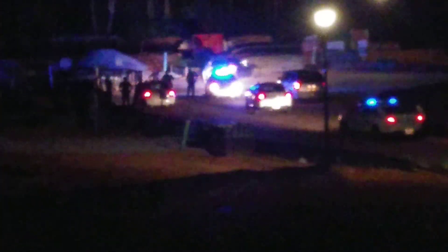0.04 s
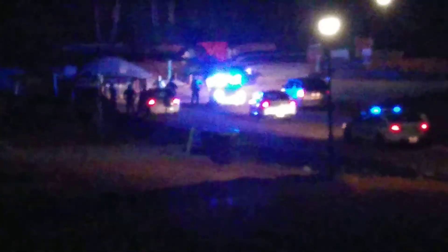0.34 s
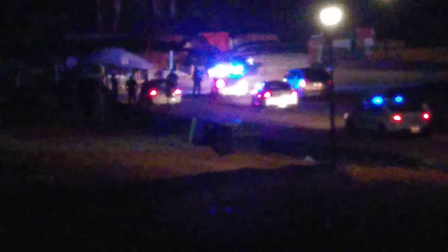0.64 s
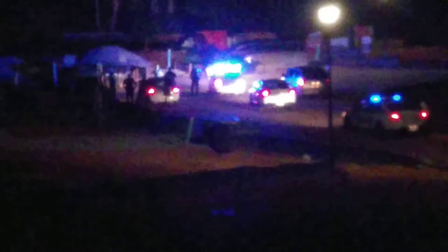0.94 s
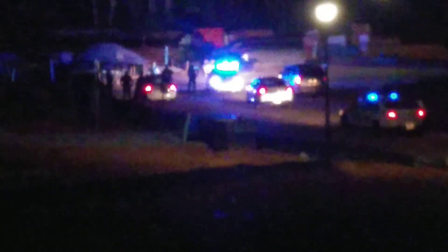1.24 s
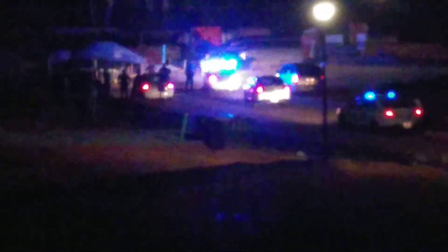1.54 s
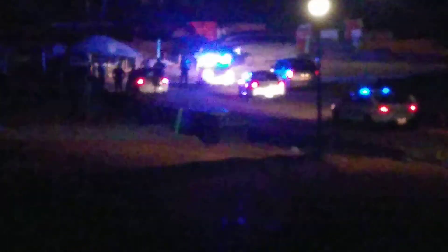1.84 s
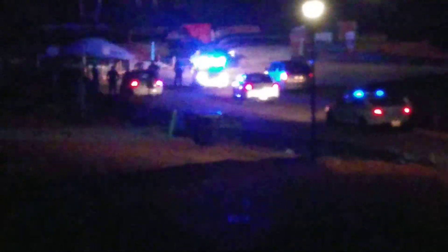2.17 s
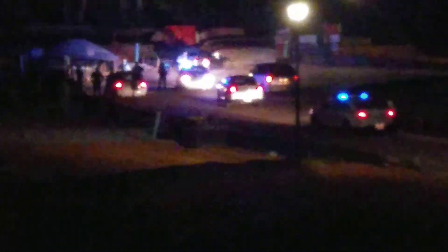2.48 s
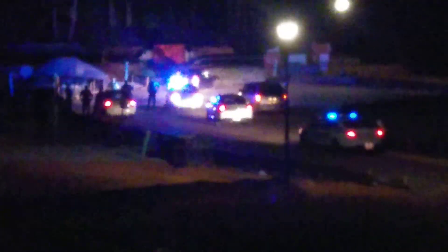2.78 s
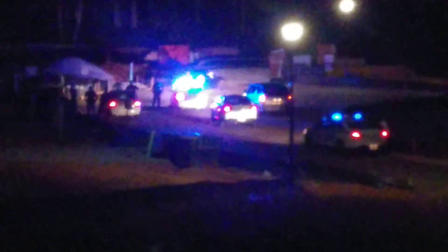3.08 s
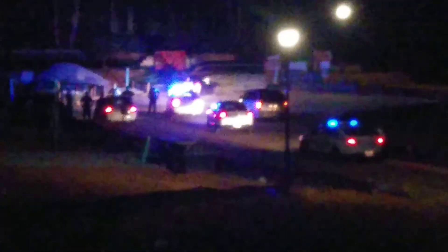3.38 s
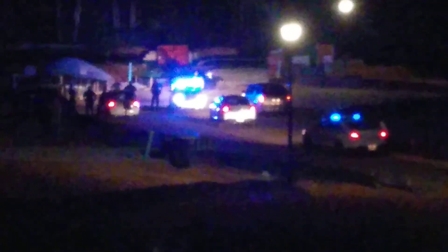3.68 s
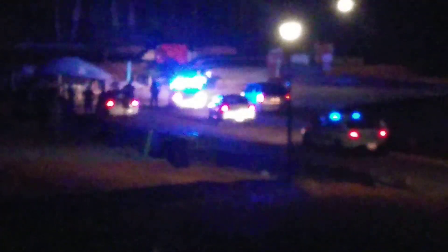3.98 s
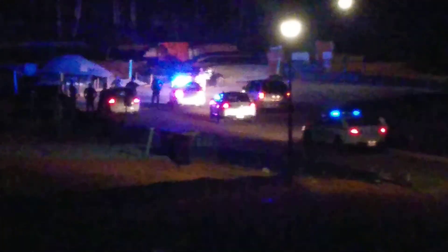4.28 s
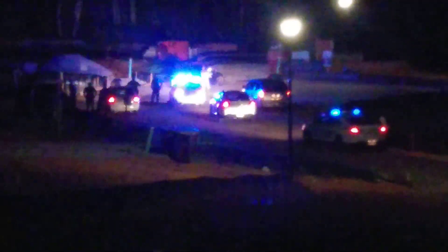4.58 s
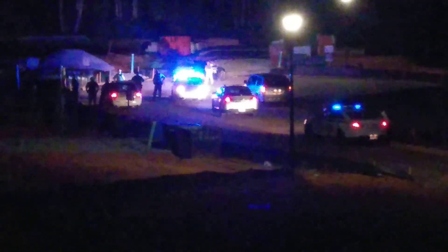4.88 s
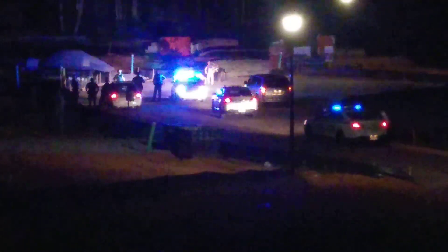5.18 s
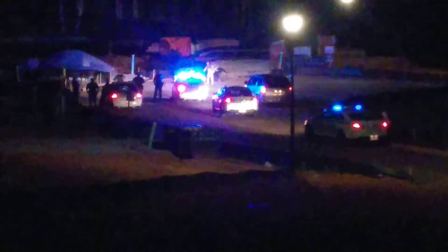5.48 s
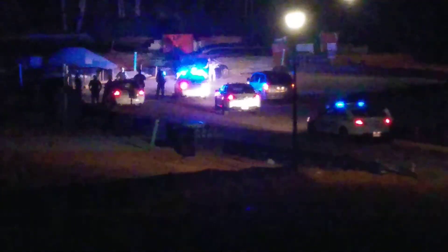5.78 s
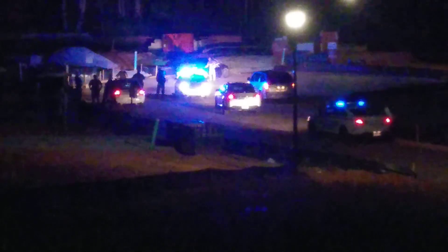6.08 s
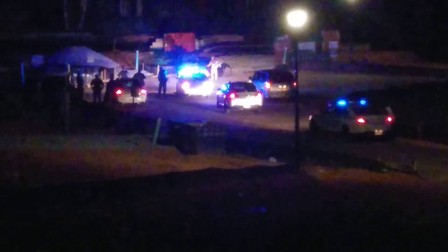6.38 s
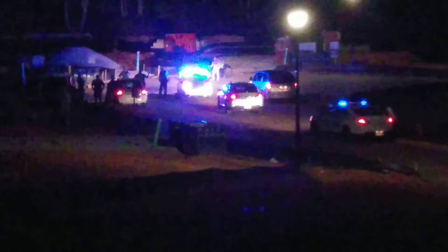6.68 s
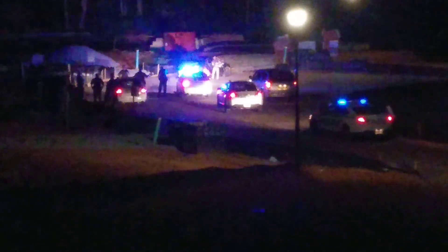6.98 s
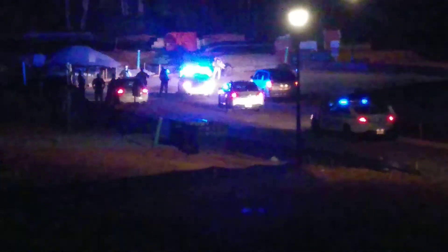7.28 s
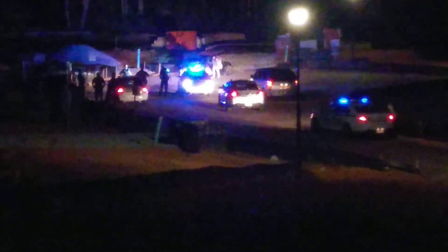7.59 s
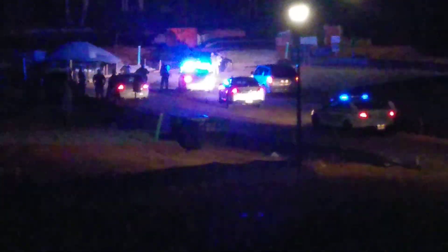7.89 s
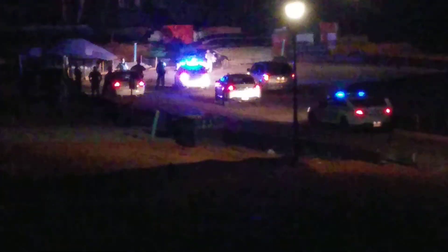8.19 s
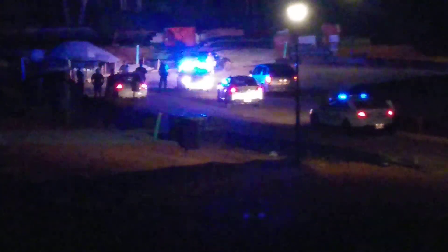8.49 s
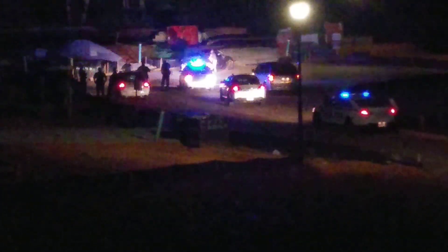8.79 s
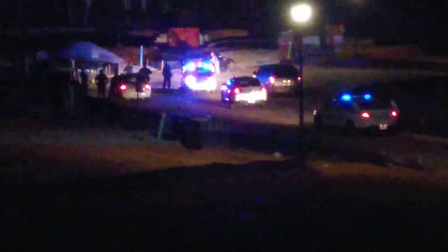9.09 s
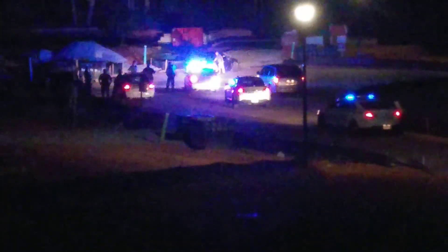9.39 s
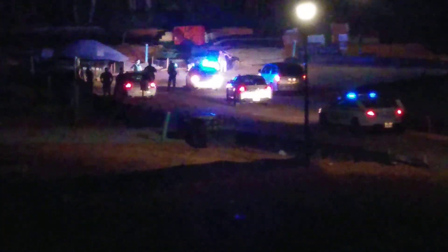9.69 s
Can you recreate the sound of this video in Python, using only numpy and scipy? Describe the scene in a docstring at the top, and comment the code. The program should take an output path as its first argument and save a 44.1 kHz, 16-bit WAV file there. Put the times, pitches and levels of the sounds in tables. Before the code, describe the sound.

Outdoors at night, a nearby cricket keeps up a fast, high-pitched trill, breaking off twice and quickly starting again. Behind it lies the low rumble of distant idling cars; one engine rises early on, then settles and fades as it moves slowly. Faint, short tree frog trills come and go over a soft haze of far insects. The cricket stays in front, with almost no echo.

```python
"""A cricket at night

A cricket trills close by in the grass, stopping twice for a moment. It sings by stridulation: some
fifty times a second a scraper on one wing runs down a file on the other, slowing as it goes, so each
stroke is a falling chirp. Far off, cars idle with a low hum, and one revs briefly and creeps along;
tree frogs trill faintly and distant insects make a soft haze."""
import sys
import numpy as np
from scipy import signal
from scipy.fft import rfft, irfft
from scipy.io import wavfile
from scipy.ndimage import uniform_filter1d

SR = 44100
rng = np.random.default_rng(int(sys.argv[2]) if len(sys.argv) > 2 else 0)


def persist_wave(psi):
    """Save psi, clipped to +-1, as 16-bit WAV."""
    counts = np.round(np.clip(psi, -1, 1) * 32767).astype(np.int16)
    wavfile.write(sys.argv[1], SR, np.atleast_2d(counts).T)


N = 433944

# runs of the trill: start t/s, end t/s, cruising stroke rate/Hz, extra rate while fresh/Hz
TRILL_BOUTS = [(-0.0024, 2.14, 52.9355, -1.538), (2.3921, 7.98, 52.1819, 3.488),
               (8.3645, 11, 52.0978, 4.09)]
# brief lags and spurts: centre t/s, half length/s, change of stroke rate/Hz
PACE_CHANGES = [(1.638, .2636, -1.363), (6.708, .3005, -2.222), (6.904, .13, 1.9), (7.393, .1, -3.203)]
# how hard the cricket sings: t/s, relative level of the tone/dB
SINGING_EFFORT = [(0, -37.5), (.45, -40), (1.5, -35), (2.13, -34.5), (2.5, -38.5), (2.95, -42),
                  (7.05, -40.5), (7.55, -37.5), (7.85, -43.5), (8.36, -42.5), (8.55, -40.5), (9.8, -36.5)]
# held wing positions: from t/s, cancelled f/Hz, depth of cancellation (0-1), lowest f of the sweep/Hz,
# gain of its low end/dB, relative overtone level/dB, relative scratch level/dB
WING_POSTURES = [(0, 4140, .95, 4040, 2, -69, -46), (1.15, 4145, 0.8, 4000, -1.5, -65, -49),
                 (2.6, 4302, 0.78, 3730, 3.5, -64, -52), (7.08, 4000, 0.5, 4060, -2, -63.5, -52),
                 (7.75, 4440, 0.6, 4000, 10, -66.5, -50), (8.17, 4230, 0.54, 3800, 1, -65, -51),
                 (9.3, 4140, .55, 4080, -1.5, -63, -54)]
# modes that ring as the scraper catches the file: f/Hz, level/dB, decay time T60/s
WING_MODES = [(4896, -39.5, 0.015), (5174, -46, 0.018), (5640, -38, 0.0067), (6440, -47, 0.0018)]
# spectrum of the wings' dry scratch: f/Hz, relative level/dB
SCRATCH_SPECTRUM = [(2000, -31), (3600, -19), (4400, 12), (5150, -1.5), (5450, -2.5), (5850, -0.5),
                    (6500, -6.5), (7500, -18.5), (8600, -14), (10000, -42), (12000, -39.5), (15500, -24)]
# friction as the wings part and reopen: t within the stroke/s, half length/s, relative level/dB
SCRATCH_PUFFS = [(0.0126, 0.0012, -1), (0.0181, 0.0016, -1.7)]
# exhaust note of the moving car: t/s, firing f/Hz, relative level/dB
EXHAUST_NOTE = [(.45, 58, -47), (.7, 73, -42), (.95, 90, -42), (1.2, 94, -38.5), (1.6, 77, -40),
                (2.9, 73, -43.5), (4.15, 73, -44), (4.35, 75, -52), (4.6, 76.5, -47), (5.8, 80, -46.5),
                (6.3, 81, -55.5), (7.1, 82, -51.5), (7.4, 82, -55)]
# idling engines and their fans: f/Hz, level/dB, rms waver/Hz
IDLE_TONES = [(58.5, -51.5, 1.69), (107.5, -57, 1.46), (439.5, -67.5, 2.97)]
# spectrum of far engines: f/Hz, relative level/dB
RUMBLE_SPECTRUM = [(20, -35), (35, -18), (47, -6), (60, -1), (85, -3), (125, -6), (150, -8), (190, -10),
                   (245, -12), (275, -10), (370, -20.5), (600, -48.5), (2000, -100)]
# spectrum of far fans and tyres: f/Hz, relative level/dB
ROAR_SPECTRUM = [(200, -13.5), (380, -4), (500, -2), (720, -2), (950, 0.5), (1150, -1), (1380, -1.5),
                 (1780, -3.5), (2050, -8), (2550, -9.5), (2850, -12.5), (3500, -11), (5000, -28),
                 (8000, -73.5)]
# far vehicles swell and sink: loudest t/s, half length/s, centre f/Hz, rise/dB
TRAFFIC_SWELLS = [(0.403, 1.35, 218, 5.5), (.5, 0.26, 50, 5), (1.598, 2.1, 1420, 2.5), (2.1, .3, 50, 9.5),
                  (2.55, .4, 218, 4), (6.05, 0.48, 49.7, 8), (6.553, 0.46, 746, 4), (7.552, 0.43, 1190, 2),
                  (7.6, 1.1, 100, 1), (8.1, .15, 50, 11.5), (9.5, 0.45, 50, 11.5)]
# tree frog trills: start t/s, length/s, f/Hz, level/dB
FROG_CALLS = [(.4, 0.98, 2590, -63), (1.35, .65, 2680, -68), (2.8, 0.42, 2330, -64),
              (3.45, 0.97, 2580, -62.5), (4.9, 0.91, 2590, -64), (5.6, .55, 2337, -62),
              (7.2, 0.91, 2550, -60.5), (8.9, 0.49, 2370, -60), (9.35, 0.553, 2620, -66)]
# spectrum of far insects and air: f/Hz, relative level/dB
HAZE_SPECTRUM = [(1500, -28.5), (3000, -12), (4400, 0.5), (5400, -6.5), (6300, -4.5), (7500, -11),
                 (9200, -16), (11000, -24), (13000, -23.5), (15500, -22.5)]


def cricket(tone_db=9.0, overtone_db=2, weak_start_db=-5, pitch_spread=.002, length_spread=.02):
    """Stridulation: the scraper strikes the file's teeth, and the wings radiate at the tooth rate."""
    t = np.arange(N) / SR
    starts, since_rest, hurry = strokes()
    stroke = np.maximum(np.searchsorted(starts, t) - 1, 0)
    pitch, length, force, ring_phase = rng.standard_normal((len(starts), 4))[stroke].T
    age = np.where(t < starts[0], 1, t - starts[stroke])
    along = age * (1 + length_spread * length)  # each stroke runs on its own time scale
    null_hz, depth, lowest_hz, low_db, over_db, scratch_db = posture(starts)[:, stroke]
    # hurried strokes sound flat; the first after a rest are weak and flatter still
    starting = np.exp(-since_rest / .04) * (hurry > 0)
    level_db = (follow(SINGING_EFFORT, starts)[0] + weak_start_db * starting)[stroke]
    speed = (1 - .0034 * hurry - .014 * starting)[stroke]
    teeth_hz, loudness, friction = stroke_shape(along)
    turns = np.cumsum(teeth_hz * speed * (1 + pitch_spread * pitch)) / SR
    phase = 2 * np.pi * (turns - np.interp(starts, t, turns)[stroke])
    # pressing on to the end of the file brings out the sweep's low end, until the scraper lifts off
    late = np.clip((along - 0.0077) / 0.0052, 0, 1)
    touching = step(teeth_hz - lowest_hz, width=60)
    chirp = touching * loudness * amp(tone_db + level_db + late * low_db) * np.sin(phase)
    tone = wing_interference(chirp, null_hz * speed, depth)
    # overtones follow the loudness by a power law and sound as they cross the upper wing resonances
    bite = amp(over_db + overtone_db) * loudness ** 0.83
    second = amp(6.5) * resonate(bite * np.sin(2 * phase), hz=8985, width_hz=480)
    third = amp(-10) * resonate(bite * np.sin(3 * phase), hz=13690, width_hz=260)
    # the wings ring softly as they open again
    ring = amp(-43) * bump(along, 0.01373, 0.0014) * np.sin(2 * np.pi * 4330 * age + ring_phase)
    scratch = wing_scratch(amp(scratch_db) * friction)
    song = wing_inertia(tone + wing_snap(age) + ring) + second + third + scratch
    return song * amp(0.05 * uniform_filter1d(force, size=64))


def strokes(fresh_s=.723, brake_hz=12.706, brake_s=.1039, jitter_s=0.0002556):
    """Phase is the integral of rate: one stroke starts per cycle, as the pace settles and then brakes."""
    bouts = []
    for start, end, cruise_hz, fresh_hz in TRILL_BOUTS:
        t = np.arange(start, end, 1 / SR)
        hurry = fresh_hz * np.exp((start - t) / fresh_s)
        braking = brake_hz * np.exp((t - end) / brake_s)
        wander = sum(change * bump(t, s, half) for s, half, change in PACE_CHANGES)
        cycles = np.cumsum(cruise_hz + hurry - braking + wander) / SR
        bouts.append([np.interp(np.arange(cycles[-1]), cycles, v) for v in (t, t - start, hurry)])
    starts, since_rest, hurry = np.hstack(bouts)
    return starts + jitter_s * rng.standard_normal(len(starts)), since_rest, np.maximum(hurry, 0)


def posture(t, shift_s=.06):
    """Wing position sets the timbre: each posture is held, then eased into the next."""
    rows = np.array(WING_POSTURES, float)
    shifts = sum((new - old)[1:, None] * step(t - new[0], shift_s) for old, new in zip(rows, rows[1:]))
    return rows[0, 1:, None] + shifts


def stroke_shape(along, base_hz=4616, run_off_s=0.013, attack_s=.0012, fade_db_per_s=1600):
    """Tooth rate is proportional to speed: the scraper leaps on, slows ever more and runs off the file."""
    leap_hz = 1600 * np.exp(-along / 0.00028)
    slowing_hz = 19200 * along + 3100000 * np.minimum(along, run_off_s) ** 2
    on_file = step(run_off_s - along, width=0.00088)
    attack = 1 - np.exp(-(along / attack_s) ** 1.5)
    loudness = attack * amp(6.5 - fade_db_per_s * along) * on_file
    puffs = sum(amp(db) * bump(along, s, half) for s, half, db in SCRATCH_PUFFS)
    friction = amp(-549.5 * along) * on_file + puffs
    return base_hz + leap_hz - slowing_hz, loudness, friction


def wing_interference(tone, null_hz, depth, gap_hz=205):
    """Destructive interference: the two wings cancel each other in two narrow bands."""
    tone = tone - np.clip(depth, 0, 1) * resonate(tone, null_hz, width_hz=110)
    return tone - np.clip(0.94 * depth, 0, 1) * resonate(tone, null_hz - gap_hz, width_hz=70)


def wing_snap(age, rise_s=0.00015):
    """Free vibration: the scraper's first catch excites damped modes of the wing."""
    modes = sum(amp(db - 60 * age / t60) * np.sin(2 * np.pi * hz * age) for hz, db, t60 in WING_MODES)
    return (1 - np.exp(-age / rise_s)) ** 2 * modes


def wing_scratch(pressure):
    """Friction noise, proportional to the pressure, is filtered by the wing's response."""
    response = unit(amp(colour(SCRATCH_SPECTRUM, np.fft.rfftfreq(N, 1 / SR))))
    return irfft(rfft(pressure * rng.standard_normal(N)) * response, N)


def wing_inertia(x, cutoff_hz=7000):
    """Inertia acts as a low-pass: the whole wing cannot start at once, so its note has no sharp click."""
    return signal.sosfilt(signal.butter(6, cutoff_hz, fs=SR, output="sos"), x)


def surroundings(x, echo_s=.0031, echo_db=-23, scatter_db=-22, t60_s=0.099):
    """Reflection and scattering: one near echo, then a short faint tail from grass and bushes."""
    t = np.arange(SR // 4) / SR
    tail = rng.standard_normal(len(t)) * amp(-60 * t / t60_s) * (t > echo_s)
    scatter = signal.fftconvolve(x, tail / np.linalg.norm(tail))[:N]
    echo = np.interp(np.arange(N) - round(echo_s * SR), np.arange(N), x, left=0)
    return x + amp(echo_db) * echo + amp(scatter_db) * scatter


def moving_car(gain_db=1.5, flutter=0.14, rise_s=0.12, fade_s=0.29):
    """Periodic firing gives a harmonic exhaust note that rises with the throttle, settles and fades."""
    t = np.arange(N) / SR
    firing_hz, note_db = follow(EXHAUST_NOTE, t)
    phase = 2 * np.pi * np.cumsum(firing_hz) / SR
    start, end = EXHAUST_NOTE[0][0], EXHAUST_NOTE[-1][0]
    running = np.clip((t - start) / rise_s, 0, 1) * np.clip((end - t) / fade_s, 0, 1)
    note = np.sin(phase) + amp(-22) * np.sin(2 * phase) + amp(-20) * np.sin(3 * phase)
    return amp(gain_db + note_db) * running * unit(note) * (1 + flutter * drift(8.8))


def exhaust_drone(hz=219, width_hz=24, level_db=-55, fade_db_per_s=0.9):
    """Pipe resonance: rough exhaust flow booms as the car pulls away, then slowly recedes."""
    t = np.arange(N) / SR
    pipe = resonate(resonate(rng.standard_normal(N), hz, width_hz), hz, width_hz)
    boom_db = 10.5 * bump(t, centre=0.67, half_width=0.34)
    return amp(level_db - fade_db_per_s * t + boom_db) * unit(pipe)


def idling_cars(unsteady_db=2):
    """Rotating engines and fans hum in tones with slow random frequency and amplitude modulation."""
    hum = np.zeros(N)
    for hz, db, waver_hz in IDLE_TONES:
        gain = amp(db + unsteady_db * drift(3))
        phase = 2 * np.pi * np.cumsum(hz + waver_hz * drift(4.11)) / SR
        hum += gain * unit(np.sin(phase))
    return hum


def traffic(rumble_db=-51, roar_db=-50.0, patchy_db=1, swell_octaves=0.92):
    """Broadband noise of far engines, fans and tyres adds up; each passing vehicle lifts its own band."""
    steady = amp(rumble_db) * noise(RUMBLE_SPECTRUM) + amp(roar_db) * noise(ROAR_SPECTRUM)
    hz, t, spectra = signal.stft(steady, SR, nperseg=2048, noverlap=1536)
    swell_db = sum(db * np.outer(bump(np.log2(hz + 1), np.log2(mid_hz), swell_octaves), bump(t, s, half))
                   for s, half, mid_hz, db in TRAFFIC_SWELLS)
    patches = uniform_filter1d(rng.standard_normal(spectra.shape), size=12, axis=0)
    patches = unit(uniform_filter1d(patches, size=14, axis=1))
    spectra = spectra * amp(swell_db + patchy_db * patches)
    return signal.istft(spectra, SR, nperseg=2048, noverlap=1536)[1][:N]


def tree_frogs(pulses_per_s=44, width_hz=190, blur=3.4):
    """Source and filter: a pulse train drives the vocal sac's resonance, blurred by distance."""
    t, calls = np.arange(N) / SR, np.zeros(N)
    throb = np.maximum(np.sin(2 * np.pi * np.cumsum(pulses_per_s + drift(2.3)) / SR), 0) ** 2
    drive = rng.standard_normal(N) * (throb + blur * throb.mean())
    for start, length, hz, db in FROG_CALLS:
        swell = np.sqrt(abs(np.sin(np.pi * np.clip((t - start) / length, 0, 1))))
        broad = signal.lfilter(*signal.iirpeak(hz, hz / width_hz / 2, SR), drive)
        sac = signal.lfilter(*signal.iirpeak(hz, hz / width_hz, SR), broad)
        calls += amp(db) * swell * unit(sac)
    return calls


def insect_haze(level_db=-61):
    """Incoherent summation: many far insects blur into a soft hiss."""
    return amp(level_db) * noise(HAZE_SPECTRUM)


def resonate(x, hz, width_hz):
    """A damped resonator of gain 1 whose centre frequency may move."""
    carrier = np.exp(2j * np.pi * np.cumsum(hz * np.ones(N)) / SR)
    pole = np.exp(-np.pi * width_hz / SR)
    return 2 * (carrier * signal.lfilter([1 - pole], [1, -pole], x / carrier + 1e-18)).real


def noise(spectrum):
    """Stationary noise of rms 1 with the given spectrum."""
    gain = amp(colour(spectrum, np.fft.rfftfreq(N, 1 / SR)))
    return unit(irfft(rfft(rng.standard_normal(N)) * gain, N))


def drift(bandwidth_hz):
    """A slow random fluctuation of rms 1."""
    hz = np.fft.rfftfreq(N, 1 / SR)
    return unit(irfft(rfft(rng.standard_normal(N)) * np.exp(-(hz / bandwidth_hz) ** 2), N))


def colour(spectrum, hz):
    """Levels in dB, interpolated on a log-frequency axis."""
    f, db = np.transpose(spectrum)
    return np.interp(np.log(hz + 1), np.log(f + 1), db)


def follow(rows, t):
    """A table's columns, interpolated linearly in time."""
    times, *columns = np.transpose(rows)
    return [np.interp(t, times, column) for column in columns]


def bump(x, centre, half_width):
    """A Gaussian bell of height 1."""
    return np.exp(-((x - centre) / half_width) ** 2)


def step(x, width):
    """A soft step from 0 to 1 where x passes zero."""
    return .5 + .5 * np.tanh(x / width)


def amp(db):
    """Amplitude ratio of a level in dB."""
    return 10 ** (np.asarray(db) / 20)


def unit(x):
    """Normalisation to rms 1."""
    return x / np.sqrt(np.mean(x ** 2) + 1e-20)


def scene():
    """Superposition: the near cricket and the far sources add in one channel."""
    near = surroundings(cricket())
    far = tree_frogs() + moving_car() + idling_cars() + exhaust_drone() + traffic() + insect_haze()
    return (near + far)[None]


def record(dry, edge_hz=15800):
    """Band limiting: a linear-phase low-pass removes the highest treble."""
    return signal.oaconvolve(dry, signal.firwin(511, edge_hz, window=("kaiser", 9), fs=SR)[None], "same")


dry = scene()
out = record(dry)
persist_wave(out)
```